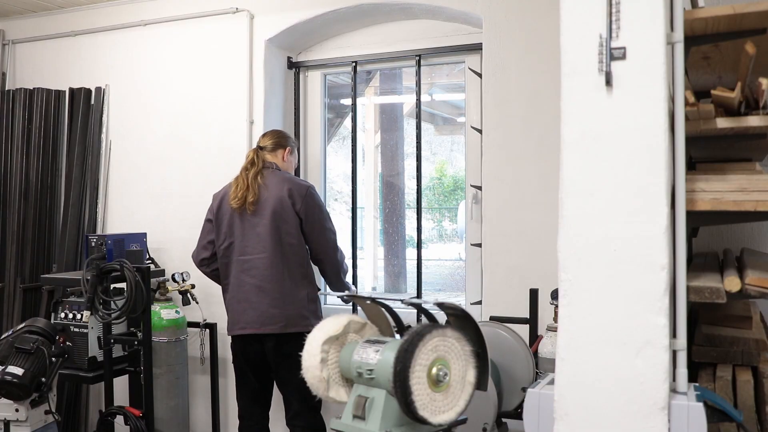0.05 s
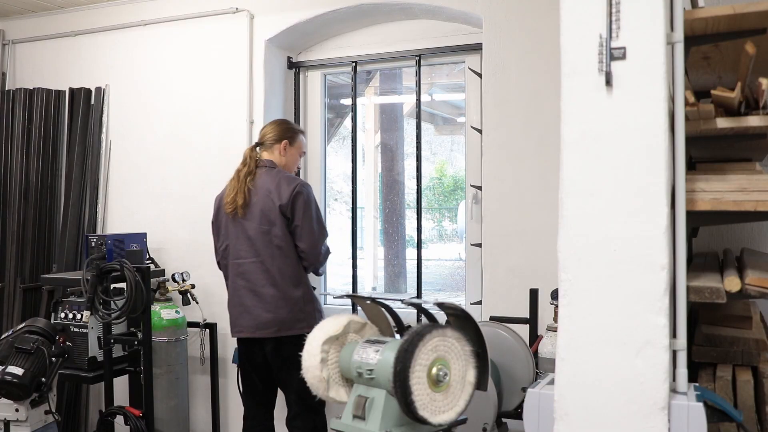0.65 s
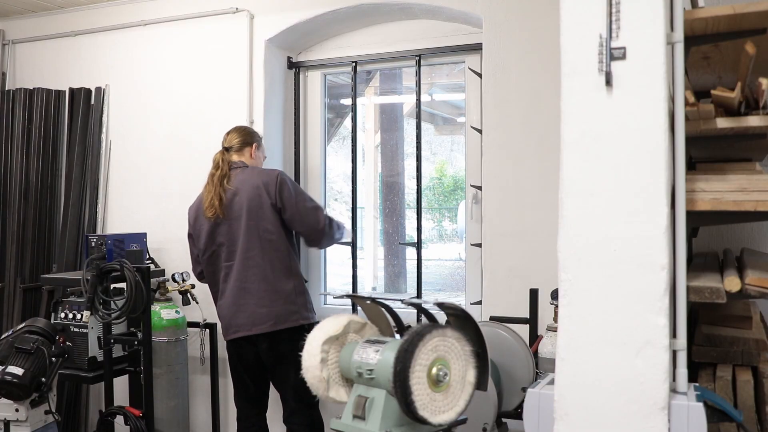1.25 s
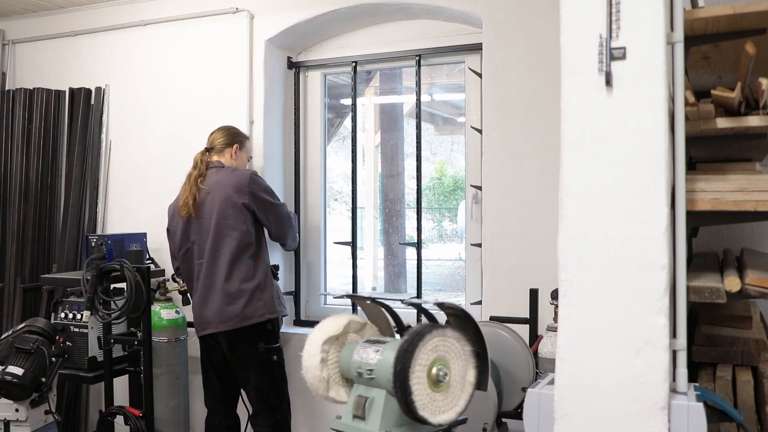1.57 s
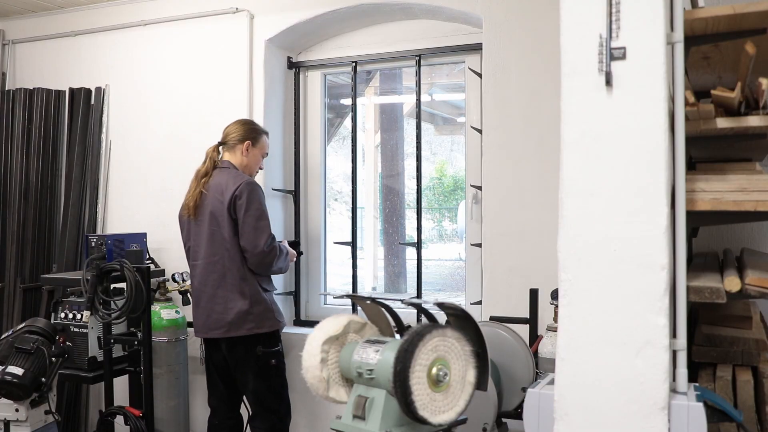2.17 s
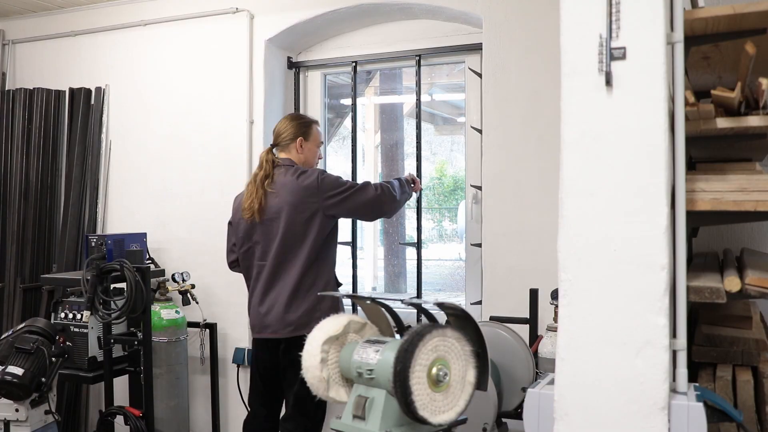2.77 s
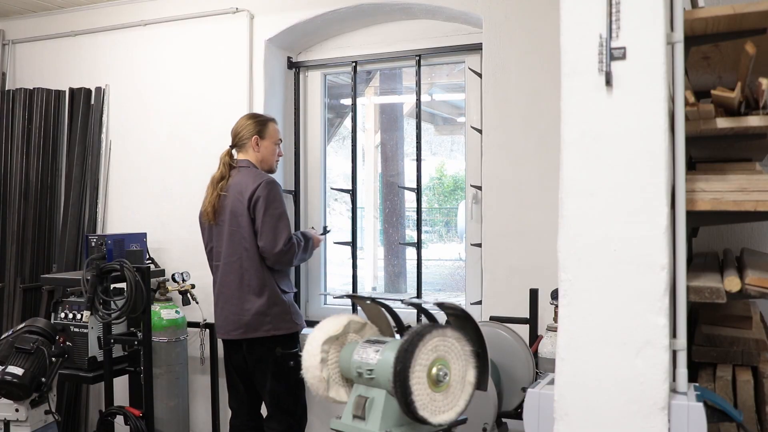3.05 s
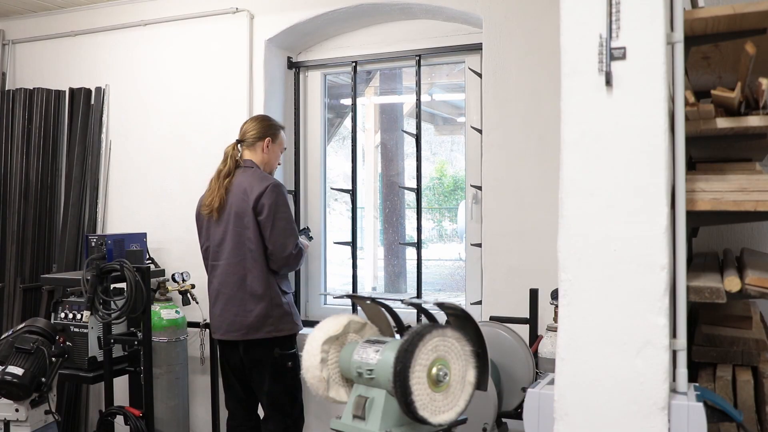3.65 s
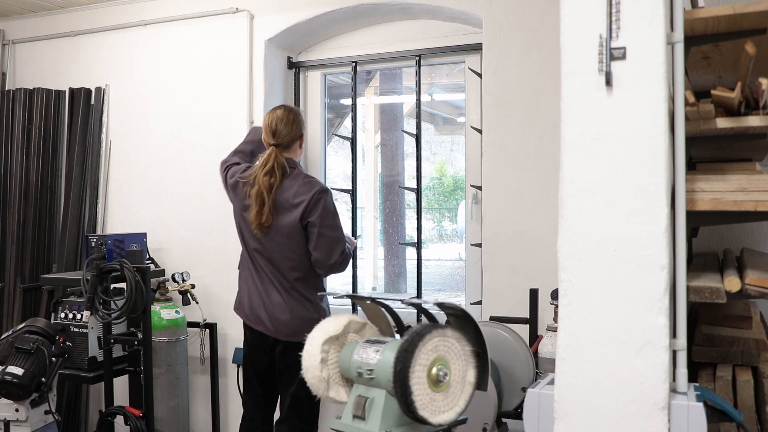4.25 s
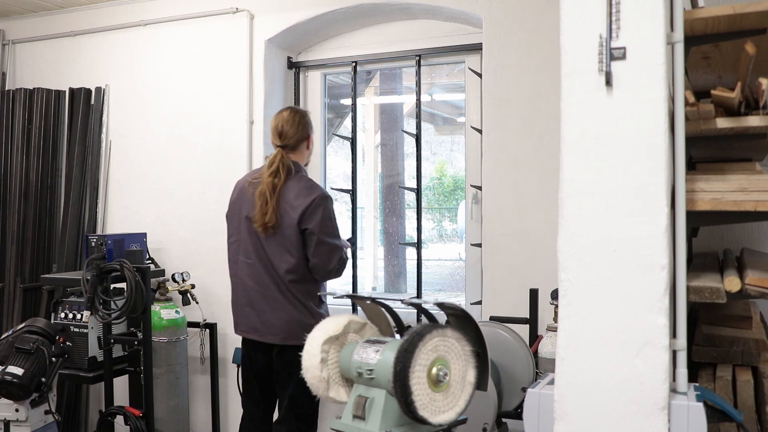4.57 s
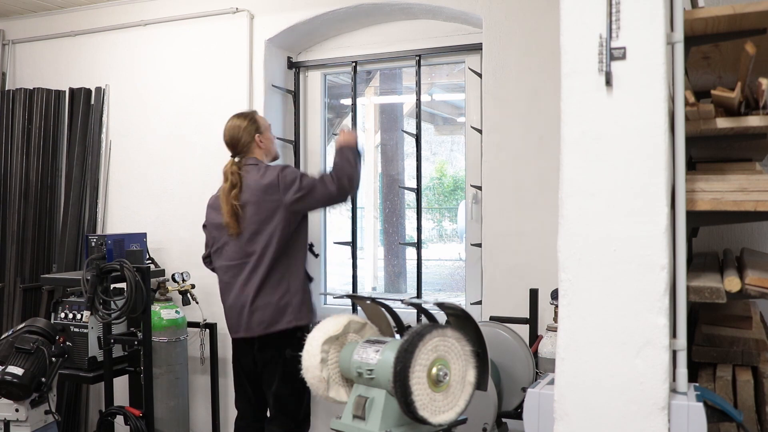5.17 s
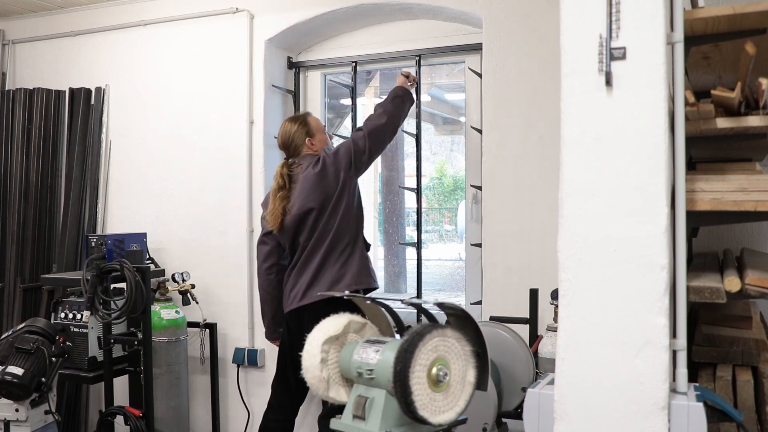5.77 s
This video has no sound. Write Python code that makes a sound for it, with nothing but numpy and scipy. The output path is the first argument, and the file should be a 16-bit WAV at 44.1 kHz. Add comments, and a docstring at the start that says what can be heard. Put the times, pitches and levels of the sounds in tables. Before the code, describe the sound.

In a small workshop with almost no echo, a sharp metallic snap opens an uneven series of clicks and short scrapes as steel brackets catch in wall rails. Loose brackets knock together in between with higher, briefly ringing clinks. The person shifts their feet softly and their jacket swishes faintly with each reach. It is all heard in mono over a low room hush.

```python
"""Hooking steel shelf brackets into wall rails

In a small, dry workshop each hook touches a slotted rail, scrapes along it and snaps into a slot.
Friction and impact excite the modes of the steel in short bursts of ringing. Between reaches the
spare brackets clink together. Feet thud softly and a work jacket rustles over quiet room noise."""
import sys
import numpy as np
from scipy import signal
from scipy.fft import rfft, irfft, next_fast_len
from scipy.io import wavfile
from scipy.ndimage import map_coordinates

SR = 44100
rng = np.random.default_rng(int(sys.argv[2]) if len(sys.argv) > 2 else 0)


def persist_wave(psi):
    """Save psi, clipped to +-1, as 16-bit WAV."""
    counts = np.round(np.clip(psi, -1, 1) * 32767).astype(np.int16)
    wavfile.write(sys.argv[1], SR, np.atleast_2d(counts).T)


N = 265345
TIME = np.arange(N) / SR

# One bracket entering its slot; level is that of the low band, brightness the middle band above it:
# (time [s], touch (lead [s], level [dB], brightness [dB]),
#  catch (rise [s], level [dB], brightness [dB], high-band level [dB]),
#  seat (lag [s], rise [s], level [dB], brightness [dB]))
HOOKINGS = [(0.0741, (.055, -35, -7), (.0005, -22, -2.5, -32), (0.033, 0.004, -44, -14)),
            (0.3734, (0.054, -51.5, -14), (.0006, -29.5, -8, -38.5), (.018, 0.0073, -39.5, -8.5)),
            (0.9421, (.026, -36, -6.5), (0.0092, -39.5, -3, -44.5), (0.016, 0.0029, -46, 3.5)),
            (1.2437, (.052, -33, -8), (.016, -35.5, -8, -57), (0.023, 0.0065, -35, -9)),
            (1.6225, (.057, -36, -6), (.003, -29.5, -4.5, -45.5), (0.032, 0.0064, -39, -18)),
            (2.0262, (.062, -47.5, -18), (0.0053, -34.5, -7, -49.5), (0.024, .0003, -35, -3.5)),
            (2.6016, (.064, -38.5, -22), (0.0059, -32.5, -9.5, -51), (0.032, .008, -52, -10)),
            (2.8751, (.058, -44.5, -9), (.0024, -27, 6, -31), (0.031, 0.0042, -30, -6)),
            (3.4128, (.068, -37.5, -18), (.0077, -34, -3, -49.5), (.094, 0.0042, -55, 1)),
            (4.0003, (.042, -51, -2), (0.0045, -41.5, 5, -48.5), (.034, .009, -40, 0.5)),
            (4.5002, (.062, -54, -15), (.0008, -35.5, -6, -42), (.049, .0002, -46, 5.5)),
            (4.9359, (.045, -58, -14), (.0005, -42.5, 9, -38), (0.063, 0.00075, -40, -12.5)),
            (5.4303, (.047, -51, -13), (.0004, -26.5, -7, -38.5), (0.041, 0.0057, -49.5, -10.5)),
            (5.7647, (.033, -45.5, -7), (0.00063, -30, -2, -33.5), (.034, .015, -42, -5))]
# A hook grazes the rail in search of a slot: (time [s], length [s], level [dB], brightness [dB])
GRAZES = [(.066, .011, -39, -5), (.366, .014, -44, -8), (.57, .04, -54, -8), (1.376, .013, -60, 8),
          (1.547, .025, -43, -20), (2.565, .025, -48, -12), (3.226, .01, -53, -9),
          (3.296, .018, -44.5, -17), (3.39, .028, -42.5, -10), (3.929, .017, -48.5, -17),
          (4.532, .036, -46.5, -13), (4.9735, .021, -48.5, -14), (5.33, .029, -47, -9),
          (5.419, .018, -47, -11)]
# Spare brackets slide over each other: (time [s], length [s], clack level [dB], chime level [dB])
CLINKS = [(0.4814, 0.013, -34, -37), (.5, .014, -51, -57), (.696, .012, -38, -24.5),
          (.724, 0.015, -46, -37), (0.763, .018, -46.5, -45), (1.008, 0.02, -62, -56.5),
          (1.837, 0.015, -49, -43.5), (2.385, 0.016, -58.5, -64), (2.432, .008, -60, -54),
          (2.4525, .014, -53.5, -43), (2.728, 0.027, -57.5, -52), (3.785, .008, -51, -38),
          (3.818, .02, -39.5, -27.5), (3.277, .012, -61, -59), (4.214, .013, -54, -47),
          (4.265, .04, -58, -58.5), (4.699, 0.018, -57.5, -50), (4.754, .02, -45, -46)]
# Spare brackets collide: (time [s], rise [s], knock level [dB], clack level [dB], chime level [dB])
CLICKS = [(.134, .0005, -50, -42, -58), (2.7349, .0005, -31.5, -32, -26), (3.7142, .0003, -69, -54, -56),
          (3.7925, .003, -35, -30.5, -21.5), (4.14, .0003, -27.5, -24.5, -17.5),
          (4.1828, .0004, -68, -56, -48), (4.2217, .0005, -35.5, -38, -28.5),
          (4.321, .0006, -41, -45, -46.5), (5.1831, .00044, -47.5, -39, -29.3)]
# Normal modes of a rail with its hook and of a loose bracket: (frequency [Hz], relative level [dB])
RAIL_MODES = [(398, -3.5), (855, -2), (1046, 0.5), (1165, -9), (1680, -4), (2250, -11), (2640, -8.5),
              (2948, -5), (3204, -6), (3840, -6), (4430, -15), (5700, -15), (5955, -19), (6070, -13),
              (7410, -21), (8764, -20), (9372, -17.5), (10520, -17.5), (12190, -31), (13355, -25)]
BRACKET_MODES = [(2030, -12), (2610, -10), (3350, -14), (4440, -7), (5690, -8), (6220, -8), (7100, -4),
                 (8063, -2), (8618, -5), (9060, -3), (9345, -3), (10432, 1), (10980, -9), (12110, -7),
                 (12985, -7), (13615, -8), (14640, -17)]
# Partials favoured by the point of impact: (time [s], frequency [Hz], relative level [dB])
STRIKE_PARTIALS = [(.074, 1165, -5), (.074, 1717, -11.5), (.074, 2924, -7), (.481, 900, -13),
                   (.481, 4430, -11), (.481, 9000, -1), (2.735, 10530, -2), (2.875, 2910, -10),
                   (2.875, 5840, -11), (2.875, 6040, -7.5), (4.14, 164, -12), (4.549, 3260, -11),
                   (4.936, 3430, 4), (4.936, 3355, 3), (5.183, 5590, -2.5), (5.43, 1040, -1.5),
                   (5.43, 2490, -2.5), (5.764, 852, -3), (5.764, 1880, -8.5), (5.764, 3920, -14)]
# Crossovers of the steel's three bands: (low to middle [Hz], middle to high [Hz])
RAIL_CROSSOVERS = (2350, 6500)
BRACKET_CROSSOVERS = (1200, 6500)
# Footfalls and shifts of weight: (time [s], length [s], level [dB])
STEPS = [(0.111, 0.036, -35), (0.19, 0.024, -47), (1.485, 0.016, -56.5), (2.73, 0.28, -51),
         (4.346, 0.021, -54.5), (4.666, 0.014, -54), (4.826, 0.015, -44), (5.192, 0.021, -48.5),
         (5.589, 0.013, -44)]
# Swishes of the jacket as the arm moves: (time [s], level [dB])
SWISHES = [(.263, -54.5), (1.478, -55), (1.9, -60.5), (2.135, -55), (2.669, -56), (2.97, -59),
           (3.16, -59.5), (3.647, -56), (3.855, -57.5), (4.635, -58), (4.822, -54.5), (5.137, -54.5),
           (5.244, -53.5), (5.583, -53), (5.661, -56.5), (5.972, -56)]
# Noise spectrum of each source: (frequency [Hz], relative spectral density [dB])
RAIL_SPECTRUM = [(40, -38), (90, -15), (190, -7), (350, -7), (580, -9), (1050, -0.5), (1450, -5.5),
                 (1950, -10), (2900, -7.5), (5300, -15), (9300, -21), (13600, -29.5), (16000, -43)]
BRACKET_SPECTRUM = [(30, -35.5), (80, -16.5), (160, -5), (400, -10), (1200, -10.5), (3800, -9.5),
                    (7500, -8), (9200, -4.5), (10600, -7), (13700, -10.5), (16000, -22)]
STEP_SPECTRUM = [(25, -26), (55, -2), (90, 6.5), (130, 2), (200, -8), (290, -20), (2000, -101.5)]
RUSTLE_SPECTRUM = [(88, -37.5), (150, -3), (790, -8.5), (1020, -9), (1500, -13.5), (10800, -21.5),
                   (16000, -28)]
ROOM_SPECTRUM = [(20, -27.5), (60, -9), (115, -3.5), (200, -10), (840, -27.5), (8000, -30), (16000, -35)]
# Decay of sound in the workshop: (frequency [Hz], reverberation time [s])
REVERB_TIMES = [(150, 0.16), (1500, 0.16), (12000, 0.12)]


def rails():
    """Friction and impact drive the modes of the rail as hooks scrape and snap into the slots."""
    contacts = [contact for row in HOOKINGS for contact in hooking(*row)]
    contacts += [rail_contact(s, length / 2, length / 2, db, bright) for s, length, db, bright in GRAZES]
    return steel(contacts, RAIL_MODES, RAIL_SPECTRUM, RAIL_CROSSOVERS, modes_db=-5.5,
                 hard_ring_db=0.5, tilt_db=4.5, grit_db=1.5, after_db=-28, after_t60=0.1)


def hooking(s, touch, catch, seat):
    """Four contacts: touch, drag, catch, seat. A short rise time makes a snap, a long one a scrape."""
    lead, touch_db, touch_bright_db = touch
    rise, db, bright_db, high_db = catch
    lag, seat_rise, seat_db, seat_bright_db = seat
    catch_fall = .0066 + .35 * rise  # a slow catch also rubs on for longer
    return [rail_contact(s - lead, rise=.0036, fall=.0112, db=touch_db, bright_db=touch_bright_db),
            rail_contact(s - .008, rise=.016, fall=.028, db=-54, bright_db=-12),
            (s, rise, catch_fall, db, db + bright_db, high_db),
            rail_contact(s + lag, seat_rise, fall=.0098, db=seat_db, bright_db=seat_bright_db)]


def rail_contact(s, rise, fall, db, bright_db):
    """Timing and three band levels of a contact: an abrupt force carries more high frequencies."""
    snap_db = 6 * np.exp(-rise / .0029)
    high_db = db - 11.5 + 0.89 * bright_db + snap_db
    return s, rise, fall, db, db + bright_db, high_db


def spare_brackets():
    """Sliding and collision briefly excite the brackets' modes: low knock, middle clack, high chime."""
    rise_share, knock_db, click_fall_s = 0.48, -15.5, .0042
    contacts = [(s, rise_share * length, (1 - rise_share) * length, clack + knock_db, clack, chime)
                for s, length, clack, chime in CLINKS]
    contacts += [(s, rise, click_fall_s, *levels) for s, rise, *levels in CLICKS]
    return steel(contacts, BRACKET_MODES, BRACKET_SPECTRUM, BRACKET_CROSSOVERS, modes_db=-0.3,
                 hard_ring_db=-0.7, tilt_db=-0.5, grit_db=3.5, after_db=-26, after_t60=0.094)


def steel(contacts, modes, spectrum, crossovers, modes_db, hard_ring_db, tilt_db, grit_db,
          after_db, after_t60):
    """Modal vibration: short bursts of ringing that die away almost as soon as each contact ends."""
    track, lead = np.zeros(N), 0.1
    t = np.arange(SR // 4) / SR - lead
    hz, mode_db = np.transpose(modes)
    strike_s, strike_hz, strike_db = np.transpose(STRIKE_PARTIALS)
    after_ring = (t > 0) * amp(after_db - 60 * np.abs(t) / after_t60)
    for s, rise, fall, *levels in contacts:
        hardness = np.tanh(np.log(0.0042 / rise))  # +1 for a sudden snap, -1 for a gentle touch
        # No two brackets are alike, and each point of contact weights the modes anew.
        detune, scatter = rng.standard_normal((2, len(hz)))
        ring = unit(partials(hz * (1 + 0.0031 * detune), mode_db + 3 * scatter, t))
        ring *= amp(modes_db + hard_ring_db * hardness)
        struck = np.abs(strike_s - s) < .005
        ring += partials(strike_hz[struck], strike_db[struck], t)
        vibration = ring + friction(spectrum, len(t), grit_db)
        vibration = filtered(vibration, lambda f: amp(tilt_db * hardness * np.log2(1 + f / 400)))
        envelope = np.maximum(pulse(t, rise, fall), after_ring)
        bands = three_bands(vibration, crossovers)
        add(track, sum(burst(band, envelope, db) for band, db in zip(bands, levels)), s - lead)
    return track


def friction(spectrum, size, grit_db):
    """Gritty stick-slip noise with a random, patchy, slightly hollow colour, new at each contact."""
    ripple_hz = np.linspace(0, SR / 2, 160)
    ripple_db = 3.5 * rng.standard_normal(len(ripple_hz))
    slips = noise(spectrum, size) * amp(grit_db * wobble(900, size))
    return unit(filtered(slips, lambda hz: amp(np.interp(hz, ripple_hz, ripple_db))))


def feet():
    """Cushioned impact: soft soles load the floor slowly, giving low thuds without any ring."""
    track, lead, rise_share = np.zeros(N), 0.5, 0.49
    t = np.arange(SR) / SR - lead
    for s, length, db in STEPS:
        force = pulse(t, rise_share * length, (1 - rise_share) * length)
        add(track, burst(noise(STEP_SPECTRUM, len(t)), force, db), s - lead)
    return track


def jacket():
    """Friction noise of stiff cloth: swishes and a faint, uneven sway add in power."""
    sway = amp(-65.5 + 1.8 * wobble(11, N))
    swishes = sum(amp(db) * pulse(TIME - s, rise=.021, fall=.021) for s, db in SWISHES)
    folds = amp(1.9 * wobble(150, N))
    return np.hypot(sway, swishes) * folds * noise(RUSTLE_SPECTRUM, N)


def reverberation(x):
    """Diffuse reflections in the cluttered workshop form a short, exponentially decaying tail."""
    hz, t, spectra = signal.stft(rng.standard_normal(SR // 2), SR, nperseg=256)
    decay = amp(-60 * t / log_interp(REVERB_TIMES, hz)[:, None])
    tail = signal.istft(spectra * decay, SR, nperseg=256)[1]
    return signal.fftconvolve(x, tail / np.linalg.norm(tail))[:N]


def room_noise():
    """Ambient noise floor: a low hush with slight, slow amplitude modulation."""
    return amp(-65 + 1.1 * wobble(4.37, N)) * noise(ROOM_SPECTRUM, N)


def partials(hz, db, t):
    """Superposition of steady sinusoids at random phases, each of rms level db."""
    phase = rng.uniform(0, 2 * np.pi, (len(hz), 1))
    return np.sqrt(2) * amp(db) @ np.sin(2 * np.pi * hz[:, None] * t + phase)


def pulse(t, rise, fall):
    """Gaussian envelope peaking at t = 0, with separate rise and fall widths in seconds."""
    return np.exp(-.5 * (t / np.where(t < 0, rise, fall)) ** 2)


def burst(x, envelope, db):
    """Amplitude modulation of x, scaled to rms level db where the envelope is 1."""
    shaped = x * envelope
    return amp(db) * shaped * np.linalg.norm(envelope) / (np.linalg.norm(shaped) + 1e-12)


def three_bands(x, crossovers):
    """Complementary filters divide a vibration into low, middle and high bands."""
    low, below_high = [filtered(x, lambda hz: 1 / (1 + (hz / edge) ** 14)) for edge in crossovers]
    return low, below_high - low, x - below_high


def noise(spectrum, size):
    """Spectral shaping of white noise, scaled to rms 1."""
    return unit(filtered(rng.standard_normal(size), lambda hz: amp(log_interp(spectrum, hz))))


def wobble(rate, size):
    """Smooth random modulation through rate values a second."""
    return map_coordinates(rng.standard_normal(size // 8), [np.arange(size) * rate / SR], mode="wrap")


def filtered(x, response):
    """Linear filtering: the spectrum of x times a frequency response."""
    size = next_fast_len(len(x) + 2048)
    return irfft(rfft(x, size) * response(np.fft.rfftfreq(size, 1 / SR)), size)[:len(x)]


def log_interp(points, hz):
    """Interpolation of (frequency [Hz], value) points on a logarithmic frequency axis."""
    point_hz, values = np.transpose(points)
    return np.interp(np.log(hz + 1), np.log(point_hz + 1), values)


def add(track, x, start):
    """Superposition of x on the track from start seconds on."""
    i = round(start * SR)
    lo, hi = max(i, 0), min(i + len(x), N)
    track[lo:hi] += x[lo - i:hi - i]


def amp(db):
    """Amplitude ratio of a level in decibels."""
    return 10 ** (np.asarray(db) / 20)


def unit(x):
    """Normalisation to rms 1."""
    return x / np.sqrt(np.mean(x ** 2) + 1e-20)


def scene():
    """Direct sound, reverberation and room noise superpose at one microphone."""
    direct = rails() + spare_brackets() + feet() + jacket()
    return (direct + amp(-23) * reverberation(direct) + room_noise())[None]


def record(dry):
    """Band limiting: a steep low-pass filter removes the highest treble."""
    cutoff_hz = 15950
    return np.array([filtered(x, lambda hz: 1 / np.hypot(1, (hz / cutoff_hz) ** 100)) for x in dry])


dry = scene()
out = record(dry)
persist_wave(out)
```